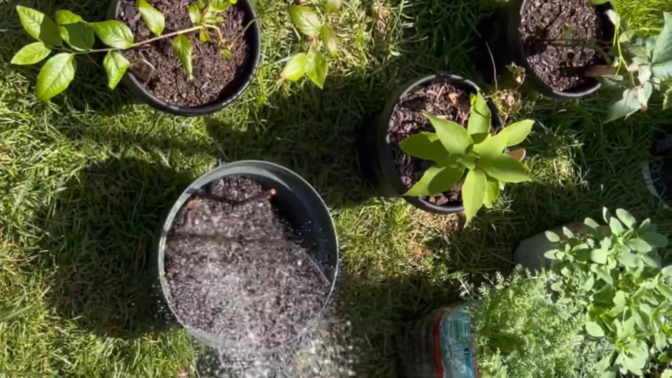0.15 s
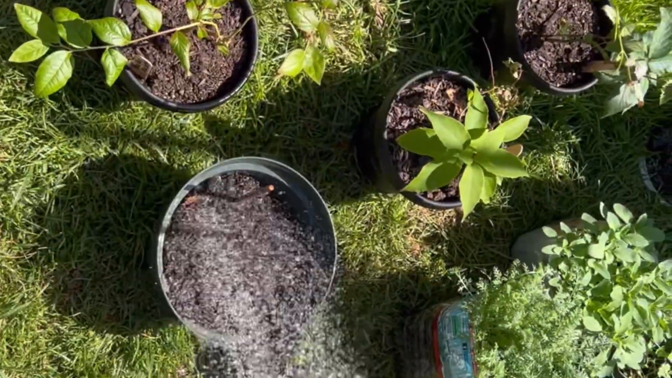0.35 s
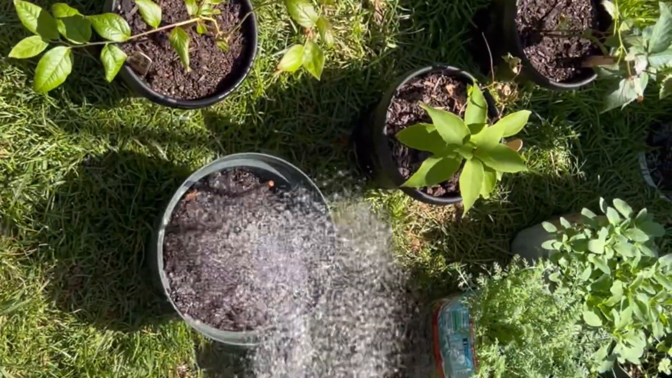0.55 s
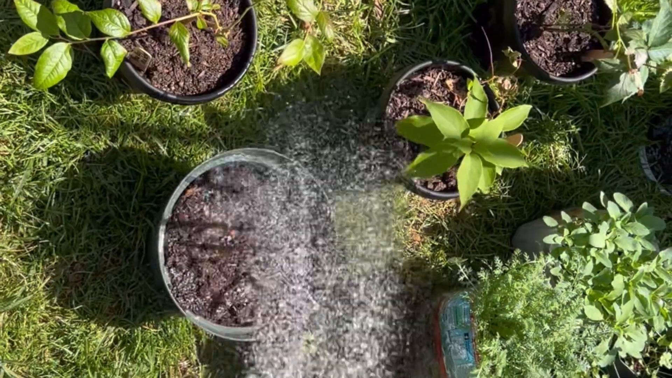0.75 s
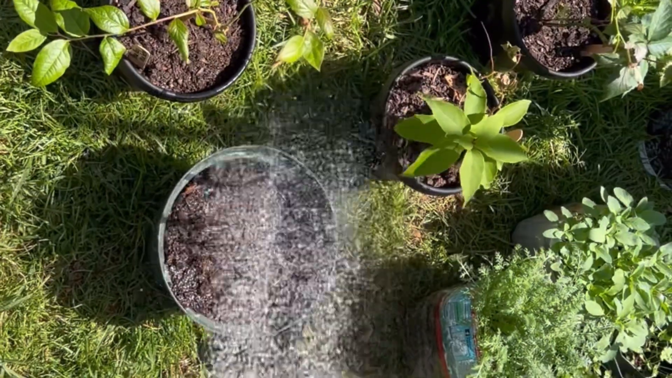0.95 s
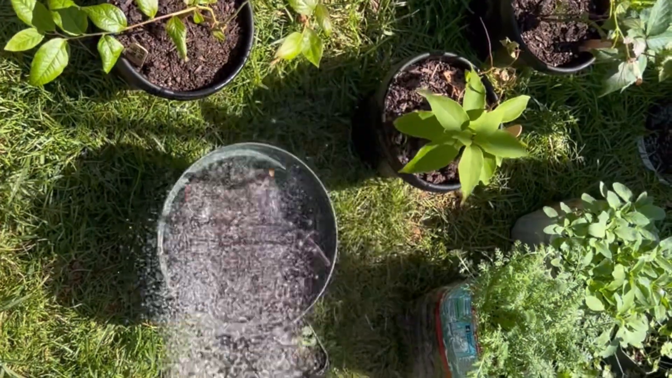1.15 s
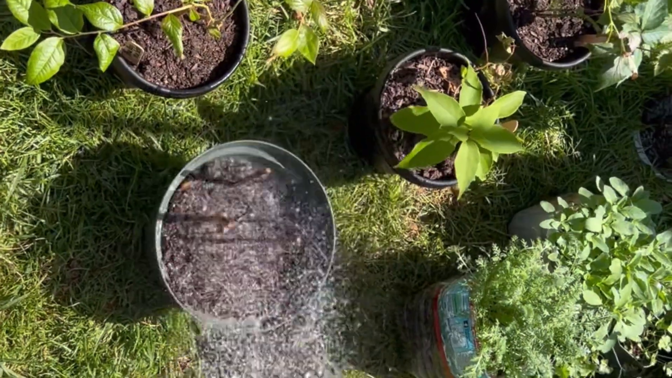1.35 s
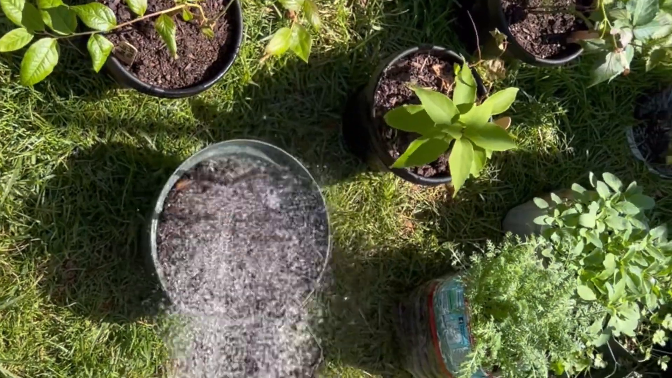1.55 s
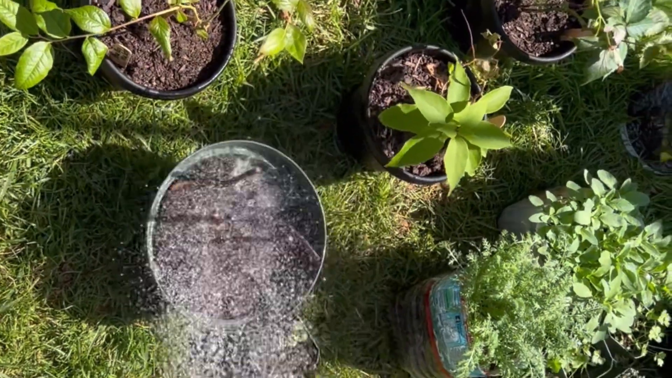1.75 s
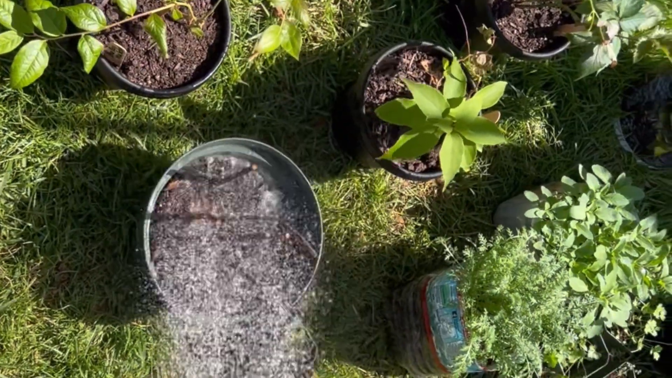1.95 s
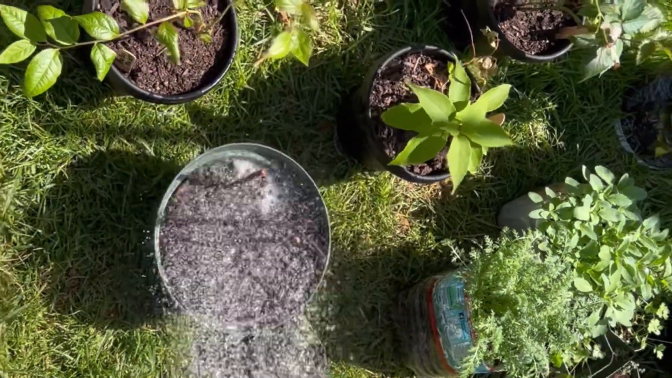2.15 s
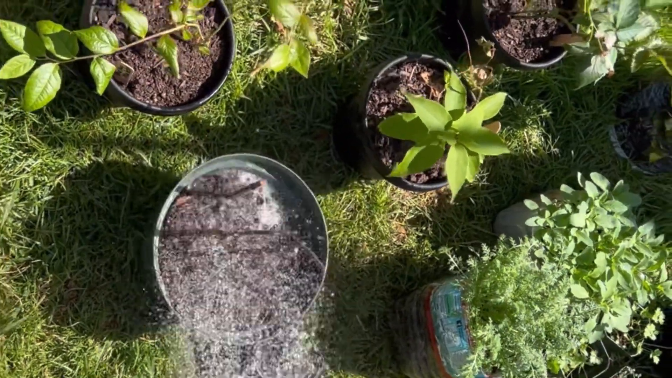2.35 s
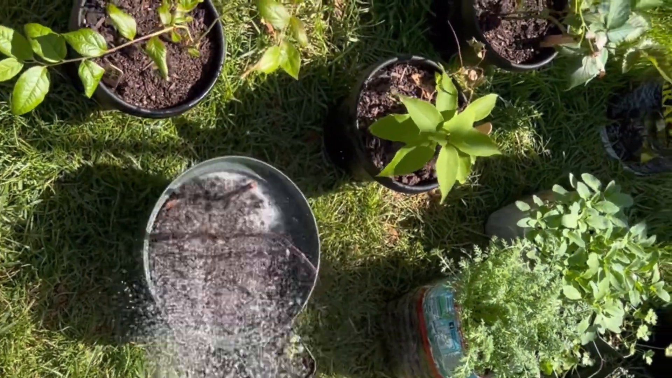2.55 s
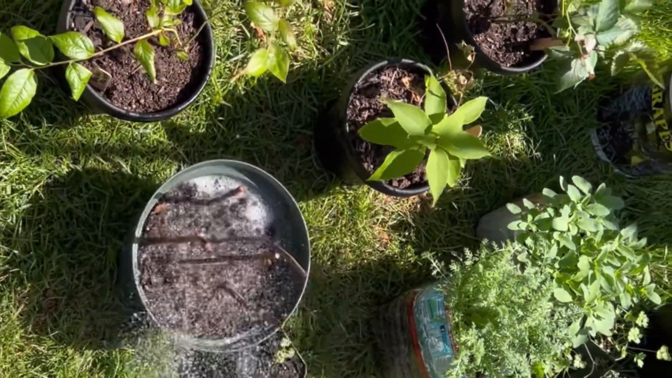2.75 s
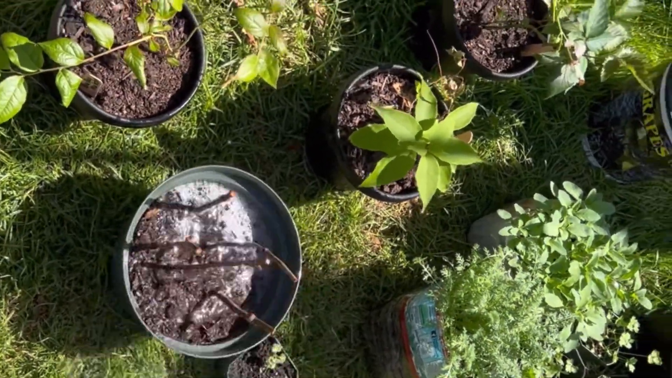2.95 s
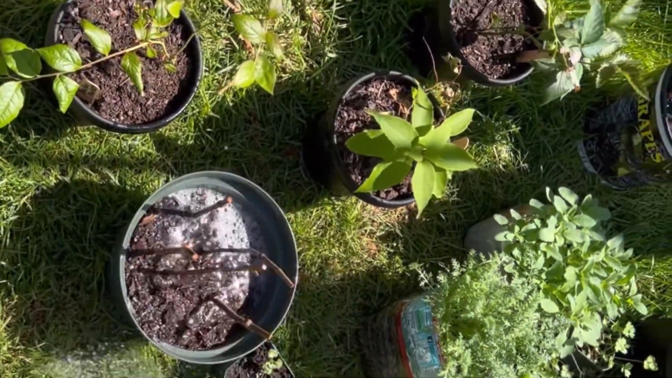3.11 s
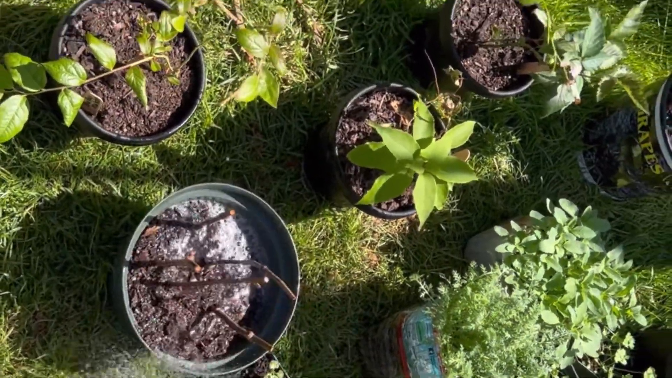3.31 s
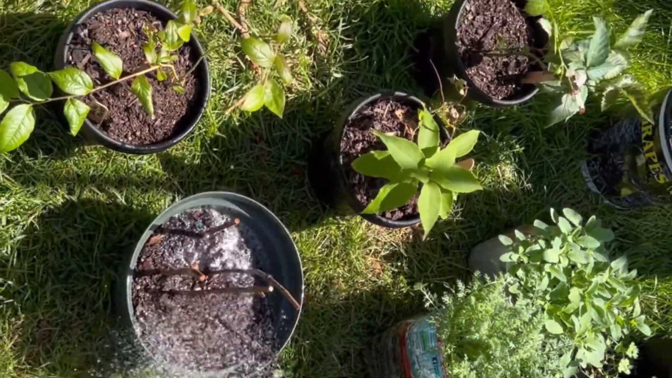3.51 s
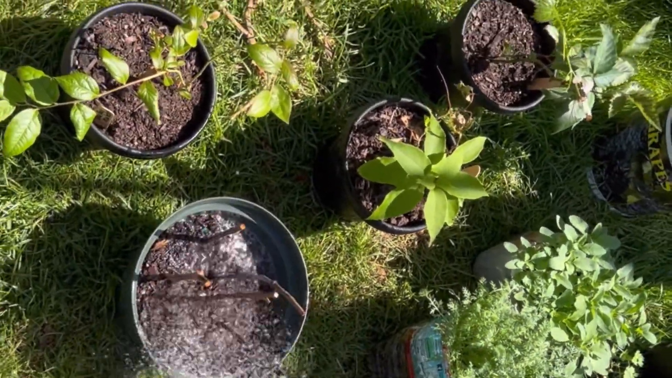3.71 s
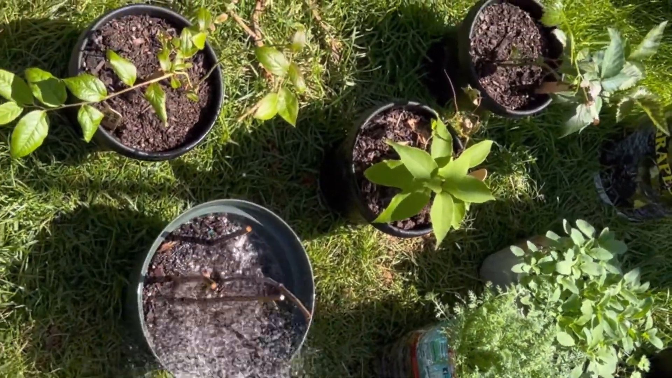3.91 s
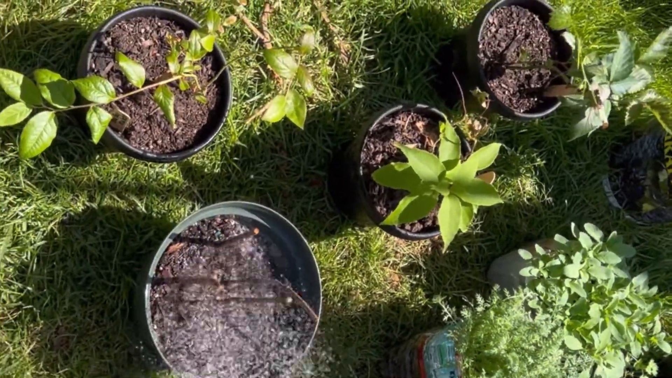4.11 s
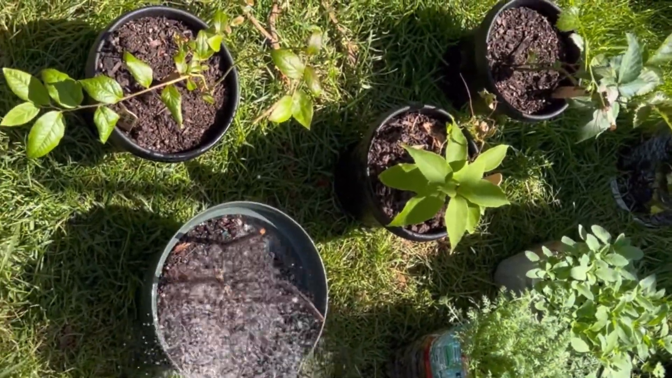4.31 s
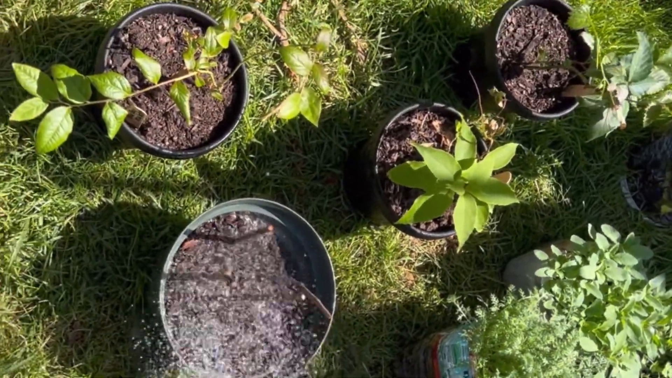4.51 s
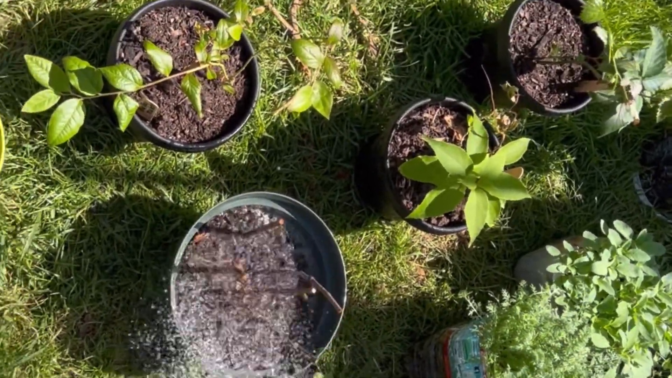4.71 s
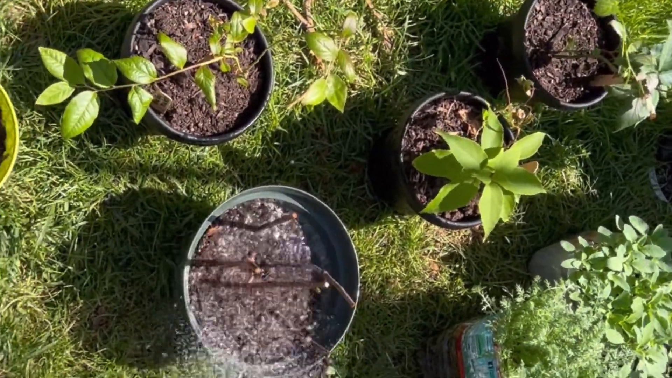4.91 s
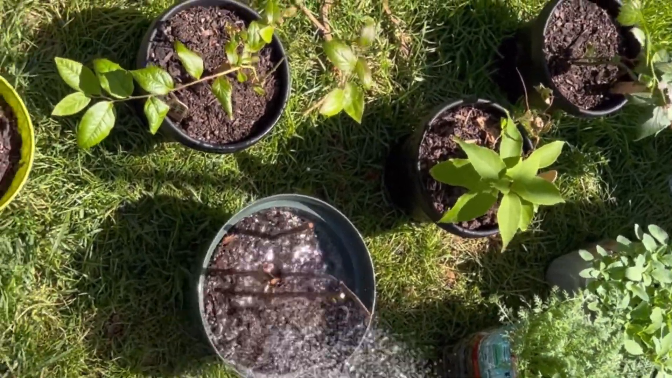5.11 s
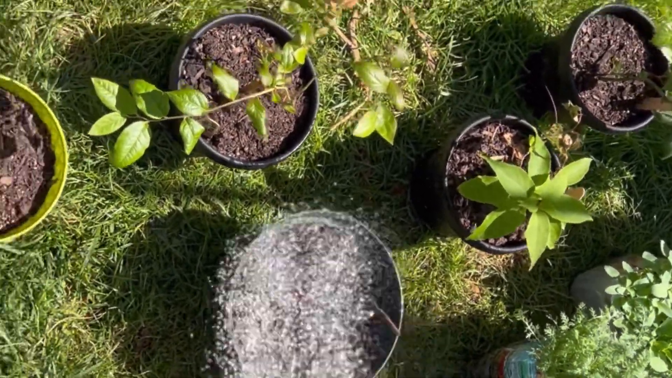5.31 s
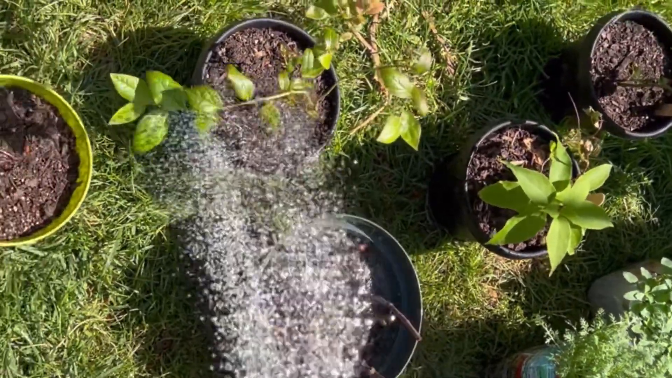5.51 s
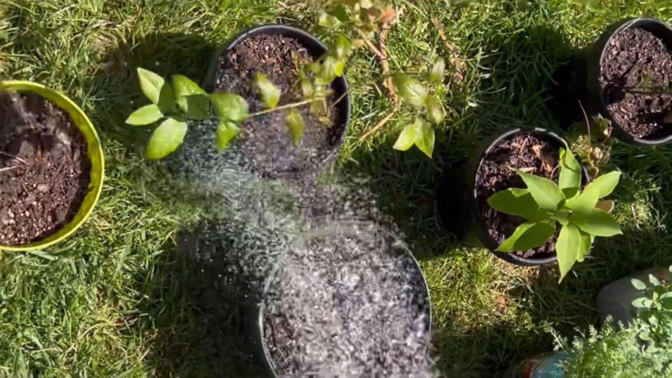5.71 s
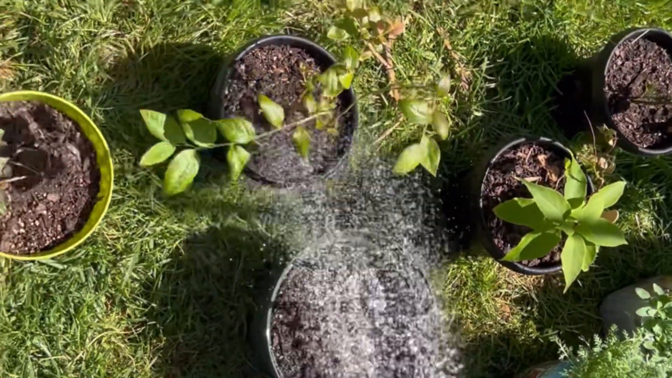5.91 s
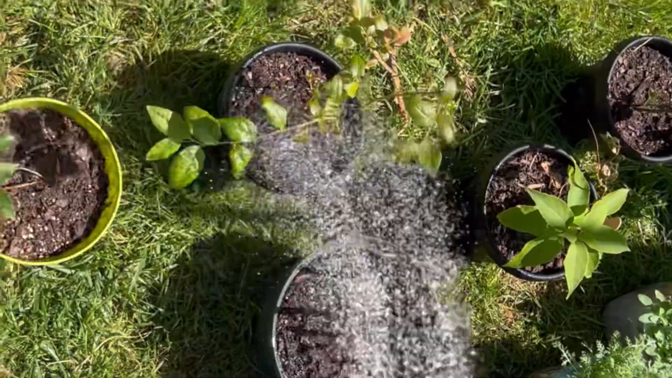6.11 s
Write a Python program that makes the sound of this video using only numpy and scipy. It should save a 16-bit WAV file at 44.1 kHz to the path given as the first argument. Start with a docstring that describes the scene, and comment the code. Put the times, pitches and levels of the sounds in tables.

```python
"""A garden lawn with potted plants, heard from just above the nozzle of a hose watering them.
Swirling water makes the spray head rush and ring; twice the jet is pinched to a thin, whistling hiss.
Drops patter on wet soil, fizz on grass, tick on leaves, plop into a puddle and splash on a pot's rim.
Under it all lie a low outdoor rumble, a few puffs of wind and a far engine picking up speed."""
import sys
import numpy as np
from scipy import signal
from scipy.fft import rfft, irfft, next_fast_len
from scipy.io import wavfile
from scipy.ndimage import uniform_filter1d

SR = 44100
rng = np.random.default_rng(int(sys.argv[2]) if len(sys.argv) > 2 else 0)


def master(y):
    """Save y as 16-bit WAV."""
    cut = np.clip(np.atleast_2d(y).T, -1, 1)
    pcm = np.round(cut * 32767)  # scale
    wavfile.write(sys.argv[1], SR, pcm.astype(np.int16))


N = 271479
T = np.arange(N) / SR


def undb(db):
    """Turn decibels into a gain to multiply by."""
    return 10 ** (np.asarray(db) / 20)


def curve(rows, column=1):
    """One column of a table, joined by straight lines in time."""
    rows = np.asarray(rows)
    return np.interp(T, rows[:, 0], rows[:, column])


def spells(tables, fade_s, column=1):
    """Gain of a sound that plays for one stretch per table and fades outside it."""
    gain = 0
    for rows in tables:
        start, end = rows[0][0], rows[-1][0]
        gate = np.interp(T, [start - fade_s, start, end, end + fade_s], [0, 1, 1, 0])
        gain = gain + undb(curve(rows, column)) * gate
    return gain


def unit(x):
    """Scale a signal to an average strength (rms) of 1."""
    return x / np.sqrt(np.mean(x ** 2))


def wander(per_s):
    """A value of about +-1 that slides from one random level to the next."""
    hold = int(SR / per_s)
    steps = np.repeat(rng.standard_normal(N // hold + 1), hold)
    return unit(uniform_filter1d(steps, hold)[:N])


def colour(x, tone, size=4096):
    """Shape a sound's lows and highs by (f/Hz, level/dB) points; white noise keeps its power."""
    hz, db = np.transpose(tone)
    f = np.fft.rfftfreq(size, 1 / SR)
    log_gain = np.log(undb(np.interp(np.log(f + 1), np.log(hz), db)))
    cepstrum = irfft(log_gain)[:size // 2]
    cepstrum[1:] *= 2  # so the filter rings only after a hit
    response = irfft(np.exp(rfft(cepstrum, size)))
    return signal.oaconvolve(x, response[None] / np.linalg.norm(response), axes=1)[:, :N]


def resonate(x, rings):
    """Make a sound ring at the given (f/Hz, width/Hz, level/dB) peaks; the result has strength 1."""
    size = next_fast_len(N)
    f = np.fft.rfftfreq(size, 1 / SR)
    power = sum(undb(db) ** 2 / (1 + ((f - hz) / width * 2) ** 2) ** 2 for hz, width, db in rings)
    return unit(irfft(rfft(x, size) * np.sqrt(power), size)[:, :N])


def noise(spread):
    """White noise; more spread makes left and right less alike."""
    mid, side = rng.standard_normal((2, N))
    return unit(mid + spread * side * np.array([[1], [-1]]))


def add(out, start_s, sound, pan):
    """Mix in a short sound; a pan above 0 moves it left."""
    i = int(start_s * SR)
    part = sound[:max(N - i, 0)]
    out[:, i:i + len(part)] += part * np.array([[1 + pan], [1 - pan]])


def drops(per_s, scatter_db, spread):
    """Random hits of unequal size, each from its own direction."""
    hit = rng.random(N) < per_s / SR
    size = undb(scatter_db * np.minimum(rng.standard_normal(N), 2.7)) * rng.choice([-1, 1], N)
    return unit(hit * size * noise(spread))


def splash(hits, decay_s, share):
    """Every hit throws off a brief tail of droplets."""
    fade = np.exp(-T[:SR // 50] / decay_s)
    power = signal.oaconvolve(np.mean(hits ** 2, axis=0), fade)[:N]
    tail = rng.standard_normal(N) * np.sqrt(np.abs(power))
    return unit(hits + share * unit(tail))


def clumps(per_s, decay_s, depth):
    """Gain of a spray that breaks into clumps: each lands at once and dies away."""
    arrivals = (rng.random(N) < per_s / SR) * rng.exponential(size=N)
    power = signal.lfilter([1], [1, -np.exp(-1 / (decay_s * SR))], arrivals)
    return unit(np.sqrt(1 + depth * power / power.mean()))


def bubble(t, hz, cycles, rise_per_s=0):
    """A ping that fades over a few cycles; its rise is a share of the starting pitch."""
    return np.sin(2 * np.pi * hz * t * (1 + rise_per_s * t / 2)) * np.exp(-t * hz / cycles)


def droplets(low_hz, high_hz, cycles, scatter_db, count):
    """Tiny bursting bubbles and drops, each pinging at its own pitch."""
    out, t = np.zeros((2, N)), T[:SR // 120]
    for when, pitch, rank, pan in rng.random((count, 4)):
        hz = low_hz * (high_hz / low_hz) ** pitch
        gain = undb(-scatter_db * np.log(rank + 0.012))  # many quiet, a few loud
        add(out, when * N / SR, gain * bubble(t, hz, cycles), 0.077 * (pan - .5))
    return unit(out)


def sweeps(rows):
    """Gain that swells and fades each time the spray passes over something."""
    return sum(undb(db) * np.exp(-2 * ((T - s) / length_s) ** 2) for s, length_s, db in rows)


def gliding_ring(hz, width_hz):
    """Noise ringing around one moving pitch."""
    pole = np.exp(-np.pi * width_hz / SR)
    swirl = rng.standard_normal(N) + 1j * rng.standard_normal(N)
    sway = signal.lfilter([1], np.poly([pole, pole]), swirl)
    return unit((sway * np.exp(2j * np.pi * np.cumsum(hz) / SR)).real)


def twist(rows, column, turn_s=0.095):
    """Hold each setting of the nozzle, then slide to the next."""
    rows = np.asarray(rows)
    held = rows[np.searchsorted(rows[1:, 0], T), column]
    return uniform_filter1d(held, int(turn_s * SR))


# nozzle settings (hard jet, shower, weak jet, shower): start t/s, overall level/dB, low ring level/dB
SETTINGS = [(0, -46.5, -6), (0.42, -49.5, 0), (2.83, -53, -6), (3.3, -47.5, -8)]
# pitches the spray head rings at: f/Hz, width/Hz, level/dB
HEAD_RINGS = [(1444, 100, -5), (1746, 110, -3.5), (2014, 85, -2), (2165, 52, 6), (2224, 71, 5),
              (2323, 180, 3), (2590, 110, -8)]
# drift of the rings: t/s, low ring f/Hz, middle ring f/Hz, all rings' level/dB
HEAD_DRIFT = [(0.45, 1520, 1980, -2), (1.0, 1530, 1977, -1), (1.4, 1560, 1898, -3.5),
              (2.0, 1610, 1902, -3.5), (2.55, 1510, 1920, -3.5), (2.9, 1630, 1930, 0.5),
              (3.5, 1645, 1922, 1.1), (4.8, 1585, 1932, 0), (5.45, 1540, 1854, 2), (5.72, 1530, 1845, 1.5),
              (5.95, 1530, 1926, 0.5)]
# tone of the broad rush: f/Hz, level/dB
RUSH_TONE = [(100, -23), (220, -8), (290, -13), (390, -8), (560, -14.5), (790, -14), (1050, -17.5),
             (2200, -14.5), (3000, -15), (5200, -29.5), (15000, -23)]

def spray_head():
    """Swirling water rushes through the head and makes it ring; two of the rings drift in pitch."""
    steady = resonate(noise(spread=0.032), HEAD_RINGS) * undb(wander(25.05))
    low = gliding_ring(curve(HEAD_DRIFT, 1), width_hz=142) * undb(twist(SETTINGS, 2))
    middle = gliding_ring(curve(HEAD_DRIFT, 2), width_hz=112) * undb(-5.7)
    rings = undb(curve(HEAD_DRIFT, 3)) * (steady + low + middle)
    rush = undb(-3.5) * colour(noise(spread=0.17), RUSH_TONE)
    return undb(twist(SETTINGS, 1)) * (rings + rush)


# the jet at full force and turned down: t/s, level/dB
HARD_JET = [(0, -36), (0.38, -35.5)]
WEAK_JET = [(2.83, -44.5), (3.02, -46), (3.22, -44.5), (3.29, -41.5), (3.34, -53), (3.6, -62), (4.0, -54)]
# their whistles: f/Hz, width/Hz, level/dB
HARD_WHISTLES = [(1980, 500, -23), (2680, 1440, -4), (3490, 350, 1.5), (4410, 890, -3.5), (5700, 550, -5.5),
                 (6770, 720, -5), (7800, 880, 2.5), (8400, 980, 3.5), (10160, 2500, -0.5),
                 (13500, 3000, -10.5)]
WEAK_WHISTLES = [(3125, 300, 2.5), (3500, 480, 1), (4080, 260, -2), (4590, 320, 4), (5550, 310, -2),
                 (6440, 790, 6.5), (7250, 500, 1), (7960, 1200, 5.5), (9400, 4800, 0), (14400, 2800, -5)]

def pinched_jet():
    """Water squeezed into a thin jet hisses with high, fluttering whistles."""
    out = 0
    for jet, whistles in ((HARD_JET, HARD_WHISTLES), (WEAK_JET, WEAK_WHISTLES)):
        hiss = resonate(noise(spread=0.13), whistles) * undb(0.59 * wander(22.88))
        out = out + spells([jet], fade_s=0.057) * hiss
    return out


# tones of the rumble and the open air: f/Hz, level/dB
RUMBLE_TONE = [(20, -46), (35, -12), (52, 1), (80, 2), (115, 0), (170, -6), (300, -13), (600, -21),
               (1500, -40.5), (8000, -89)]
AIR_TONE = [(20, -40), (60, -22), (150, -23.5), (400, -8), (650, -5), (1100, -5.5), (1800, -27.5),
            (2800, -16.5), (8000, -16.5)]

def outdoors():
    """A low, wavering rumble and a soft hush of air from all around."""
    rumble = colour(noise(spread=0.06), RUMBLE_TONE) * undb(-50.5 + 1.56 * wander(8))
    air = colour(rng.standard_normal((2, N)), AIR_TONE) * undb(-52.5)
    return rumble + air


# puffs of wind: t/s, length/s, level/dB, left-right spread (0-1)
PUFFS = [(0.094, 0.025, -40, 0.04), (0.537, 0.038, -45, 0.1), (0.678, 0.044, -49, 0.2),
         (2.142, 0.014, -51, 0.7), (5.371, 0.053, -52, 0.8)]

def wind():
    """Soft puffs hit the microphone as deep thumps."""
    out = 0
    for s, length_s, db, spread in PUFFS:
        swell = undb(db) * np.exp(-((T - s) / length_s) ** 2)
        out = out + swell * resonate(noise(spread), [(58, 43, 0)])
    return out


# two spells of showering: t/s, level/dB on grass and leaves, level/dB on soil
SHOWER_FIRST = [(0.42, -45, -54.5), (0.59, -47.5, -51), (0.62, -39, -46.5), (0.78, -47, -48),
                (1.08, -40.5, -44.5), (1.3, -39.5, -44), (1.43, -41.5, -47), (1.6, -39.5, -44.5),
                (2.1, -40.5, -43.5), (2.45, -39.5, -43.5), (2.68, -39.5, -46.5), (2.73, -39, -46),
                (2.79, -37.5, -45), (2.82, -44, -50)]
SHOWER_SECOND = [(3.33, -52.5, -65), (3.48, -50.5, -60), (3.53, -44, -56), (4.2, -41.5, -50.5),
                 (4.9, -42.5, -52.5), (5.08, -44.5, -53.5), (5.34, -40.5, -46), (5.42, -52, -54),
                 (5.48, -55, -54), (5.6, -52, -54.5), (5.74, -56, -53.5), (5.87, -43.5, -53.5),
                 (6.16, -48.5, -49.5)]

def shower_flow():
    """How hard the shower lands: one gain for grass and leaves, one for soil."""
    return [spells([SHOWER_FIRST, SHOWER_SECOND], fade_s=.02, column=column) for column in (1, 2)]


# tone of wet soil: f/Hz, level/dB
SOIL_TONE = [(100, -10), (320, 0), (570, -12), (800, -4.5), (1120, -4.5), (1900, -2), (3000, -1),
             (4300, -0.1), (5300, -8.5), (6800, -6), (11000, -2.5), (16000, -8)]
# pitches of the hollow pot: f/Hz, width/Hz, level/dB
POT_RINGS = [(794, 230, -1.5), (1960, 420, 1.5)]

def soil_patter(flow):
    """Crowds of drops patter dully on soil, burst tiny bubbles and make the pot ring."""
    hits = splash(drops(per_s=8000, scatter_db=2, spread=0.018), decay_s=0.0032, share=0.6)
    patter = unit(colour(hits * clumps(per_s=220, decay_s=.005, depth=.7), SOIL_TONE))
    pings = droplets(low_hz=1800, high_hz=5000, cycles=2.6, scatter_db=3.4, count=2400)
    pot = resonate(drops(per_s=900, scatter_db=3, spread=.1), POT_RINGS)
    return undb(5) * flow * (patter + undb(-9) * pings + undb(-11) * pot)


# the shower thins for its second spell: t/s, drops per second
GRASS_DROP_RATE = [(2.8, 9000), (3.5, 4500)]
# tones of fine and fat drops on grass: f/Hz, level/dB
FIZZ_TONE = [(1000, -48), (4000, -28), (5500, -12.5), (7000, -9), (8200, -3.5), (9600, -3), (11000, 1.5),
             (12200, -5), (14000, -6.5), (16000, -10.5)]
CRACKLE_TONE = [(1000, -24), (3500, -4), (6500, -4.5), (10500, 3.5), (13000, -2), (16000, -3)]

def grass_fizz(flow):
    """Fine drops fizz brightly on the blades of grass while fatter ones crackle."""
    fine = drops(per_s=curve(GRASS_DROP_RATE), scatter_db=3.2, spread=.65)
    fine = splash(fine, decay_s=0.00077, share=0.92) * clumps(per_s=90, decay_s=.005, depth=.5)
    fizz = unit(colour(fine, FIZZ_TONE)) * undb(.6 * wander(14))
    pings = droplets(low_hz=8500, high_hz=13500, cycles=6, scatter_db=3.3, count=2400)
    fat = splash(drops(per_s=130, scatter_db=2, spread=.4), decay_s=.0016, share=1.1)
    crackle = unit(colour(fat, CRACKLE_TONE))
    return undb(0.94) * flow * (fizz + undb(-7) * pings + undb(-9) * crackle)


# the loudest drops on near leaves: t/s, level/dB, f/Hz
LEAF_TICKS = [(0.614, -23, 8900), (0.916, -30, 10900), (0.9466, -21.5, 11500), (1.2138, -20.5, 9620),
              (1.2855, -18.5, 10550), (1.5574, -22.5, 8310), (1.953, -18.5, 9900), (2.4513, -22, 10900),
              (2.4788, -25, 10800), (2.5447, -24, 9270), (2.609, -25, 10300), (2.7203, -19, 12000),
              (2.7942, -21, 10700), (2.8059, -23, 10100), (2.8168, -24, 10500), (3.5876, -26, 10500),
              (4.26, -20, 11810), (4.3195, -29, 7200), (4.4366, -25, 10900), (4.5066, -23, 10000),
              (4.6063, -23.5, 11500), (4.6508, -22.5, 11120), (4.6836, -26.5, 8540), (4.812, -25.5, 5900),
              (4.869, -28, 6430), (4.9206, -22.5, 9360), (4.9796, -20, 11510), (5.2918, -25, 9430),
              (5.3751, -27, 9200), (6.0236, -25, 10500), (6.1395, -26, 10400)]
# tone of their crack: f/Hz, level/dB
CRACK_TONE = [(500, -34), (3000, -4), (6500, 6), (10500, 15), (13000, -1), (16000, -16)]

def leaf_ticks(flow):
    """Drops hit leaves with a crack and a very short ring; random strays are sized by the flow."""
    when, size, pitch = rng.random((24, 3)).T
    i = (when * N).astype(int)
    stray_db = 20 * np.log10((flow[i] + 1e-9) * (.5 + size)) + 6
    stray_hz = 10800 * 2 ** (.6 * (pitch - .5))
    cracks, rings, t = np.zeros((2, N)), np.zeros((2, N)), T[:SR // 200]
    for s, db, hz in list(LEAF_TICKS) + list(zip(T[i], stray_db, stray_hz)):
        pan = rng.uniform(-0.21, 0.22)
        contact_s = 0.0015 * np.sqrt(undb(db))  # bigger drops take longer to flatten
        blow = undb(db) * np.exp(-t / contact_s)
        add(cracks, s + .001, 0.47 * blow * rng.choice([-1, 1], len(t)), pan)
        add(rings, s + .0011, 1.43 * blow * np.sin(2 * np.pi * hz * t), pan)
    return rings + colour(cracks, CRACK_TONE)


# bursts of drops on leaves: t/s, length/s, level/dB
FLURRIES = [(0.622, 0.03, -42), (1.286, 0.0021, -28.5), (1.294, 0.012, -37), (3.294, 0.035, -44.5),
            (5.379, 0.008, -37.5), (5.431, 0.008, -41.5), (5.585, 0.041, -42.5), (5.657, 0.02, -40),
            (5.771, 0.0089, -32.5), (5.802, 0.0067, -35.5), (5.84, 0.0046, -41), (5.913, 0.0055, -38),
            (5.997, 0.021, -40.5), (6.078, 0.013, -38), (6.13, 0.02, -40)]
# their tone: f/Hz, level/dB
FLURRY_TONE = [(500, -24), (3000, -8.5), (7000, -1), (9300, 6), (11200, 4.5), (12500, -4), (16000, -9)]

def leaf_flurries():
    """The edge of the spray brushes the leaves and rattles them."""
    return sweeps(FLURRIES) * colour(drops(per_s=5000, scatter_db=3.5, spread=0.23), FLURRY_TONE)


# the fattest drops landing in the pot: t/s, level/dB, starting f/Hz
SLAPS = [(1.009, -28, 1860), (1.641, -22, 1620), (1.854, -29, 2120), (1.8721, -22, 2410),
         (2.053, -26, 2800), (2.064, -23, 1850), (2.0775, -19, 4460), (2.097, -26, 1950),
         (2.103, -24, 2650), (2.109, -25.5, 2750), (2.143, -25, 1880), (2.157, -28, 1650),
         (2.168, -30, 1250), (2.1765, -22.5, 1320), (2.246, -27, 1530), (2.277, -27, 2050),
         (2.607, -26, 1910), (2.7385, -23, 2170), (2.7785, -30, 1700), (2.795, -26, 1900),
         (4.166, -24, 3700), (4.254, -27, 5240), (4.272, -33, 3206), (5.286, -24, 2354)]

def slaps():
    """A fat drop cracks into pooled water and leaves an air pocket whose pitch rises as it closes."""
    out, t = np.zeros((2, N)), T[:SR // 80]
    for s, db, hz in SLAPS:
        pocket = bubble(t, hz, cycles=3, rise_per_s=32)
        crack = .5 * rng.standard_normal(len(t)) * np.exp(-t / .0007)
        add(out, s + .001, undb(db - 3.5) * (pocket + crack), rng.uniform(-.1, .1))
    return out


# plops of the water pooling in the pot: t/s, level/dB
PUDDLE = [(1.05, -58), (1.6, -53), (1.8, -54.5), (2.15, -51), (2.45, -51), (2.8, -54), (2.95, -63)]

def puddle(low_hz=1054, high_hz=3070, size_range_db=14):
    """The spray churns water on the soil into plops that rise in pitch, louder as it deepens."""
    out, t = np.zeros((2, N)), T[:SR // 40]
    for when, pitch, size, pan in rng.random((750, 4)):
        hz = low_hz * (high_hz / low_hz) ** pitch
        plop = bubble(t, hz, cycles=2.6, rise_per_s=25) * undb(size_range_db * size ** 2)
        add(out, when * N / SR, plop, .2 * (pan - .5))
    return unit(out) * spells([PUDDLE], fade_s=0.03)


# passes over the pot's rim: t/s, length/s, level/dB
RIM_PASSES = [(1.06, 0.082, -46), (2.732, 0.046, -36.5), (5.32, 0.04, -44.5)]
# their tone: f/Hz, level/dB
RIM_TONE = [(500, -22), (1600, -12), (2300, 3), (4200, -0.5), (6500, -3.5), (9000, -1), (16000, -21)]

def rim_splashes():
    """The spray crosses the pot's rim in bright splashes."""
    return sweeps(RIM_PASSES) * colour(drops(per_s=5000, scatter_db=5, spread=0.071), RIM_TONE)


# the far engine: t/s, firing f/Hz, hum level/dB, lower hum level/dB
ENGINE = [(1.75, 87.3, -70, -67), (2.0, 95.3, -51.5, -72), (2.5, 115.9, -55.5, -54), (2.8, 123, -57, -55.5),
          (3.1, 126.5, -51.5, -60), (4.1, 130.1, -53.5, -69), (4.7, 132.3, -63, -56),
          (5.3, 135.1, -54.5, -52), (6.16, 140.4, -59, -66)]

def engine():
    """An engine speeds up, humming unevenly at its firing rate and at half that rate."""
    firing_hz = curve(ENGINE) * (1 + .013 * wander(22))
    phase = 2 * np.pi * np.cumsum(firing_hz) / SR
    hum = np.sin(phase) * undb(curve(ENGINE, 2))
    lower_hum = np.sin(phase / 2) * undb(curve(ENGINE, 3))
    return np.sqrt(2) * (hum + lower_hum) * undb(2.6 * wander(16))


# loose drops on the pot: t/s, level/dB
SPATTER = [(3.55, -73), (3.88, -55), (4.25, -51.5), (4.6, -55.5), (4.9, -56), (5.1, -56), (5.33, -48)]

def wall_spatter():
    """Fine, loose drops ping against the near wall of the pot."""
    pings = droplets(low_hz=4600, high_hz=8800, cycles=3, scatter_db=2.8, count=1300)
    return pings * spells([SPATTER], fade_s=0.051)


# chirps on the rim: t/s, f/Hz, level/dB
CHIRPS = [(3.689, 8290, -42), (3.742, 8040, -46), (3.857, 7850, -44), (3.873, 7250, -42.5)]

def rim_chirps(width_hz=350):
    """Thin streams graze the pot's rim, each making a short, high chirp."""
    out, t = np.zeros((2, N)), T[:SR // 25]
    swell = np.exp(-((t - t.mean()) / 0.0096) ** 2)
    for s, hz, db in CHIRPS:
        pole = np.exp((2j * np.pi * hz - np.pi * width_hz) / SR)
        ring = signal.lfilter([1], [1, -pole], rng.standard_normal(len(t))).imag
        add(out, s - t.mean(), undb(db) * unit(ring) * swell, pan=0)
    return out


def scene():
    """The hose, the garden and everything the water hits, added together."""
    on_plants, on_soil = shower_flow()
    return (spray_head() + pinched_jet() + outdoors() + wind()
            + soil_patter(on_soil) + grass_fizz(on_plants) + leaf_ticks(on_plants) + leaf_flurries()
            + slaps() + puddle() + rim_splashes() + engine() + wall_spatter() + rim_chirps())


# how far the microphone's right side runs ahead of its left: f/Hz, phase/radians
RIGHT_LEAD = [(0, 0), (4700, 0), (6500, 1.4), (12000, 1.32), (16000, 1.8)]

def record(dry):
    """The microphone hears high sounds slightly out of step left and right, and cuts the very highest."""
    size = next_fast_len(N + SR // 10)
    lead = np.interp(np.fft.rfftfreq(size, 1 / SR), *np.transpose(RIGHT_LEAD))
    shift = np.exp(.5j * lead * np.array([[-1], [1]]))
    shifted = irfft(rfft(dry, size) * shift, size)[:, :N]
    top_cut = signal.ellip(10, .2, 70, 15750, fs=SR, output="sos")  # steep above 15750 Hz
    return signal.sosfilt(top_cut, shifted)


dry = scene()
out = record(dry)
master(out)
```